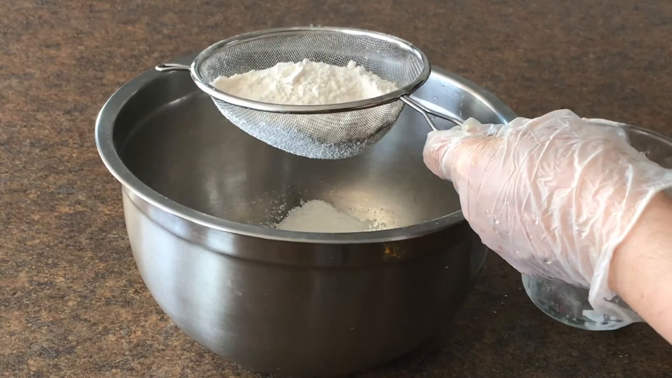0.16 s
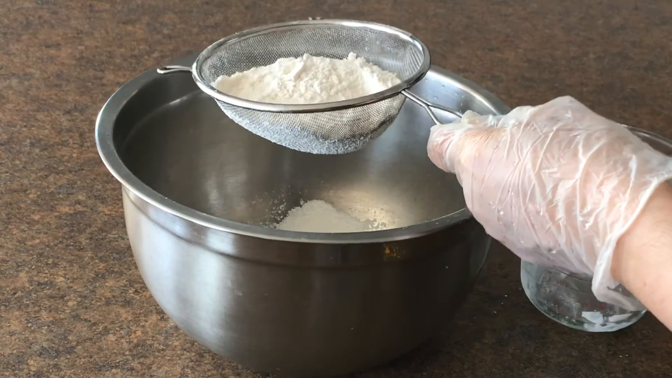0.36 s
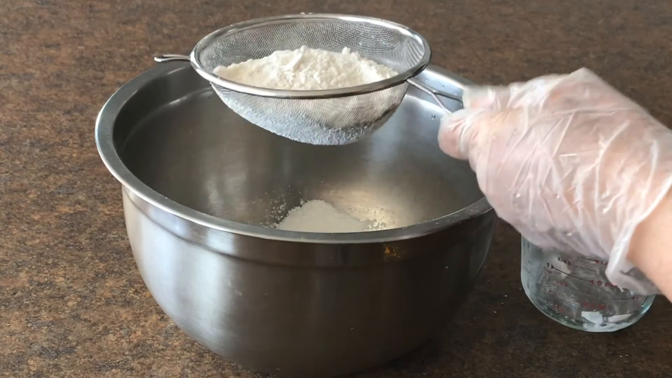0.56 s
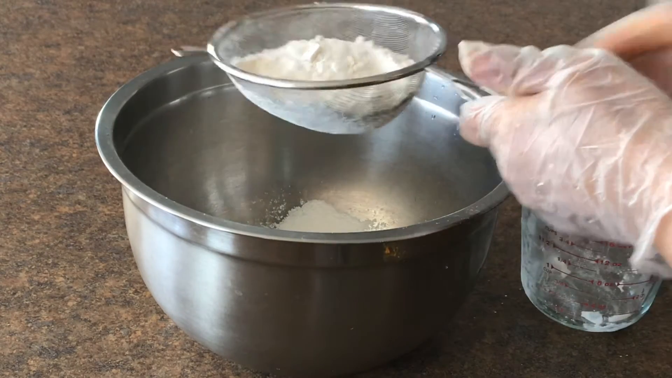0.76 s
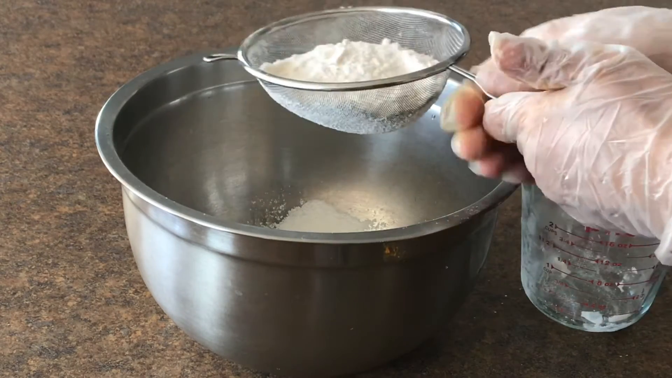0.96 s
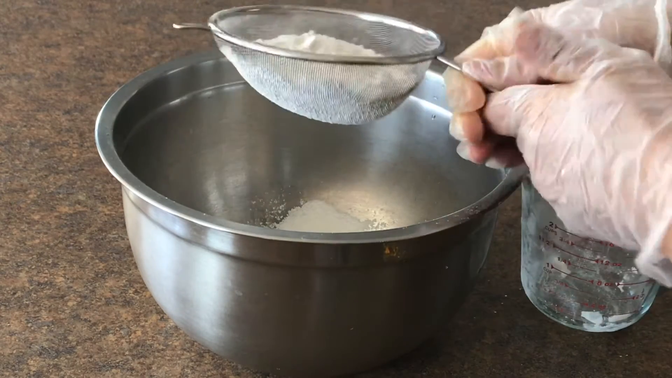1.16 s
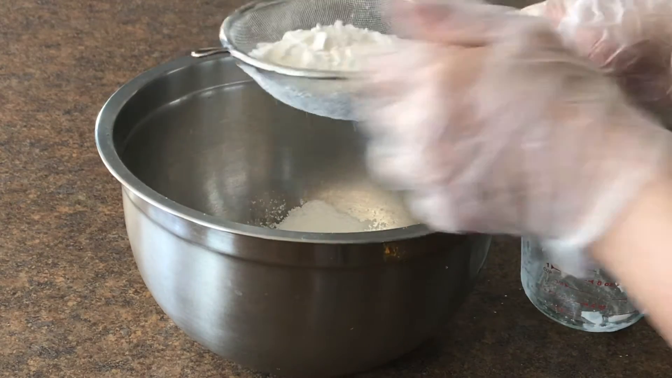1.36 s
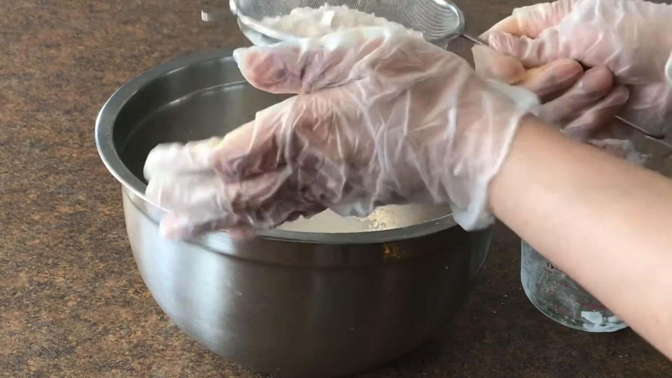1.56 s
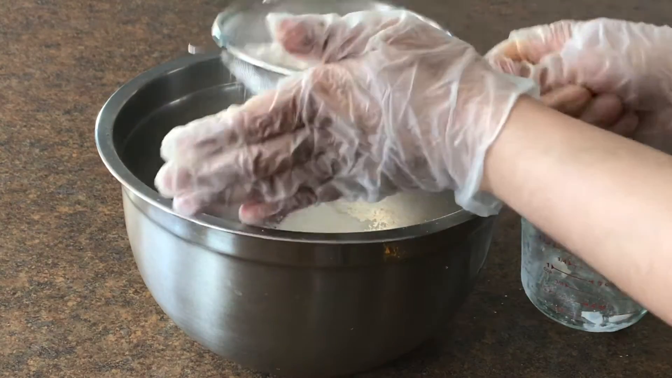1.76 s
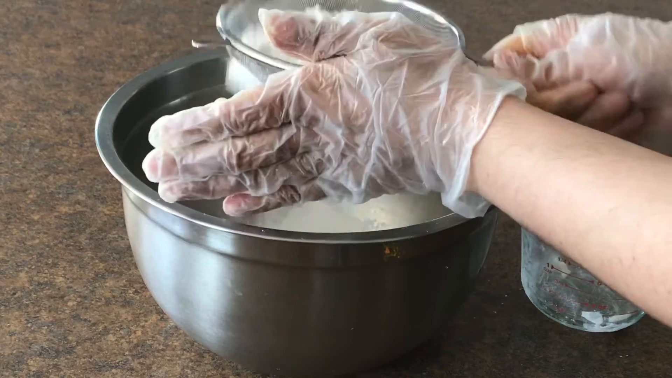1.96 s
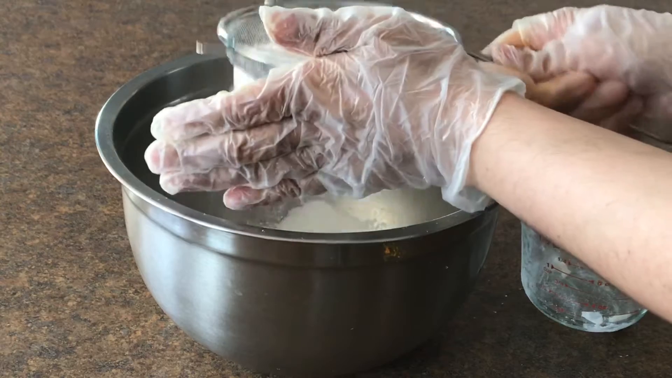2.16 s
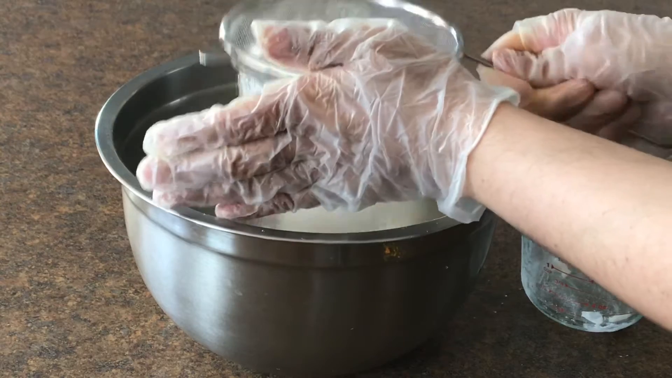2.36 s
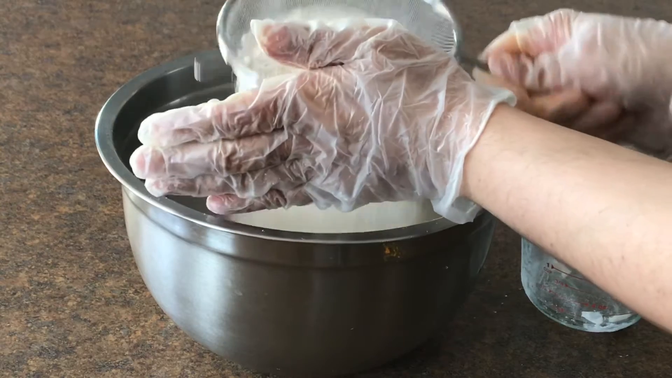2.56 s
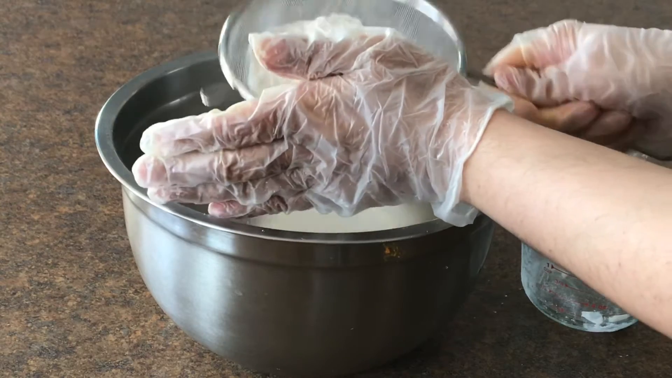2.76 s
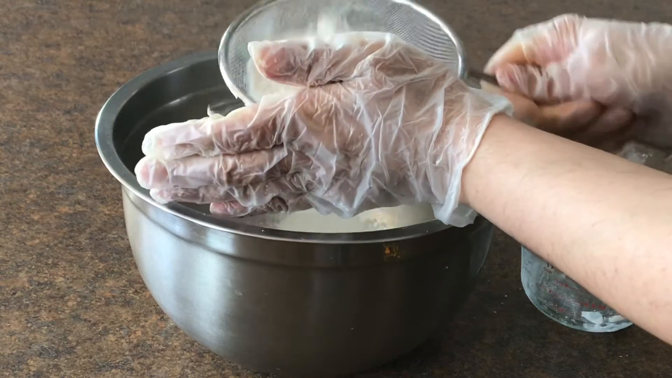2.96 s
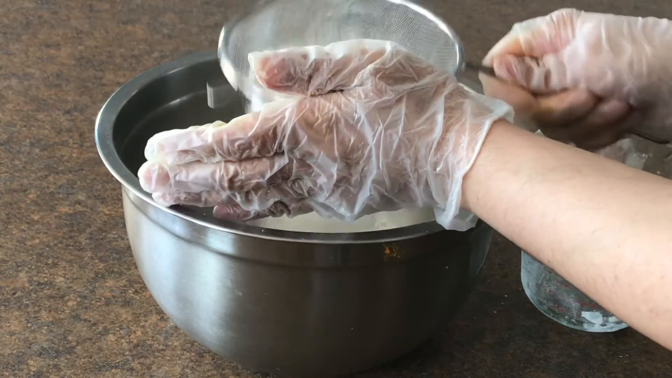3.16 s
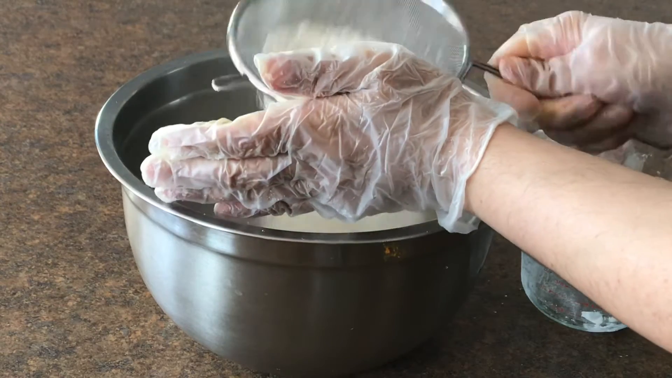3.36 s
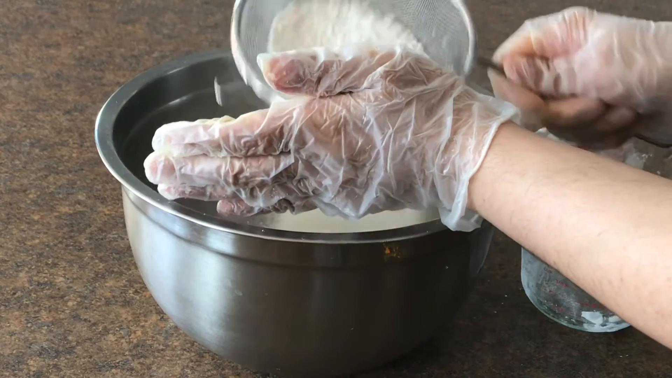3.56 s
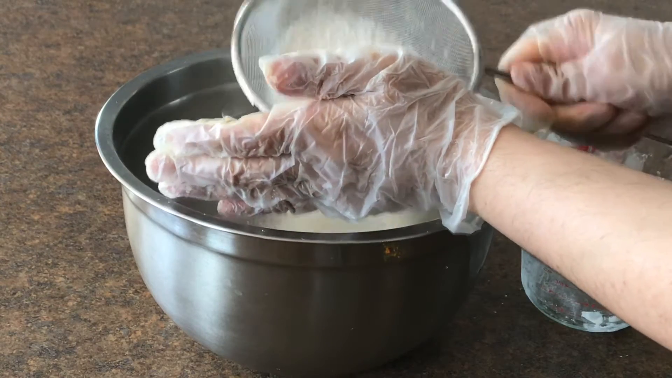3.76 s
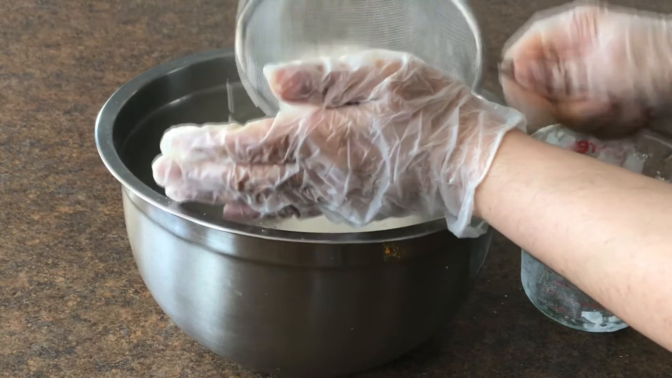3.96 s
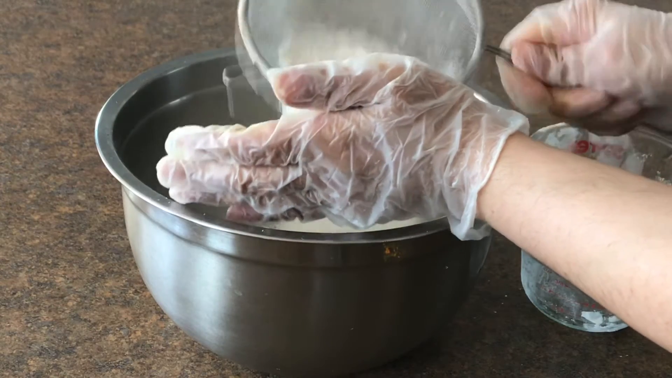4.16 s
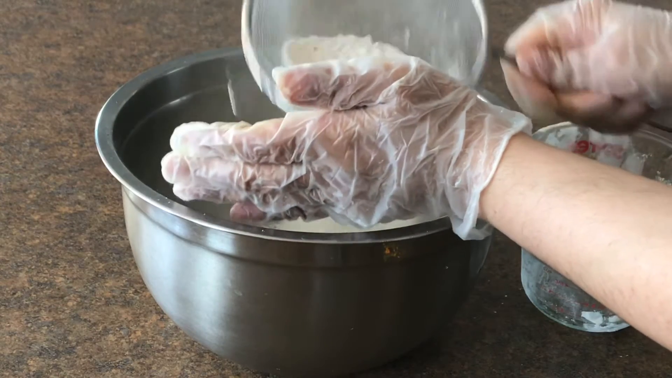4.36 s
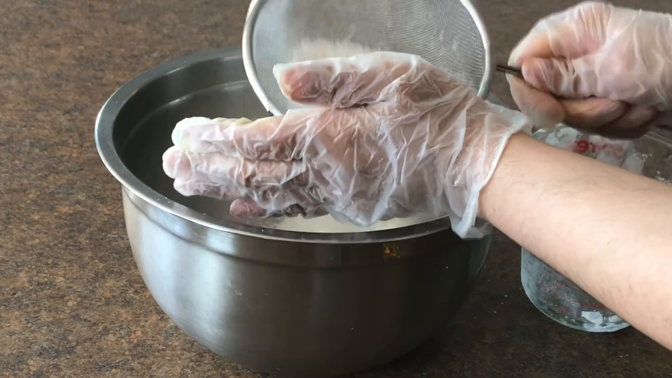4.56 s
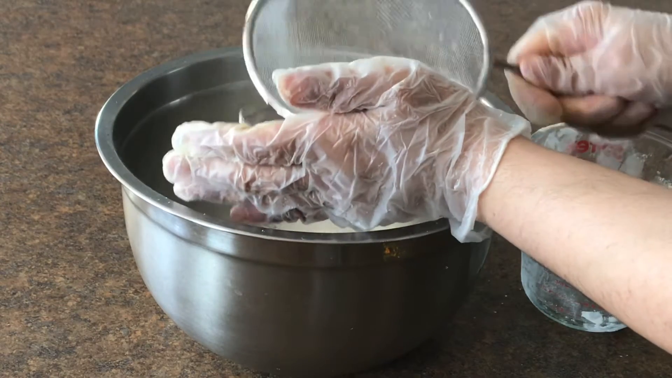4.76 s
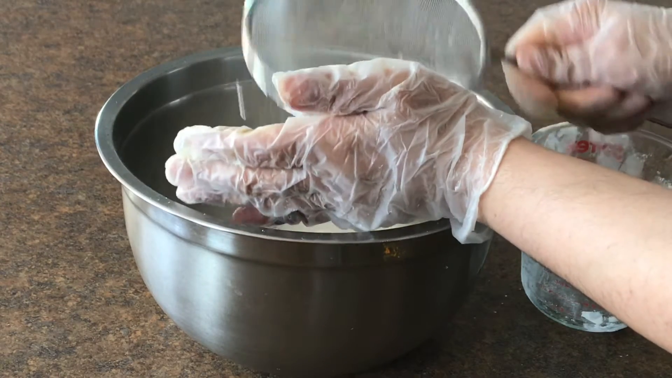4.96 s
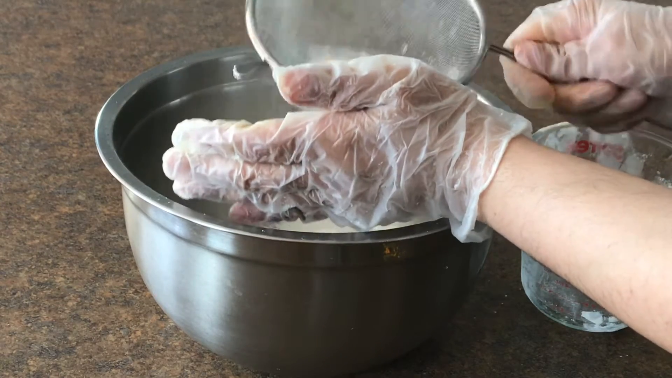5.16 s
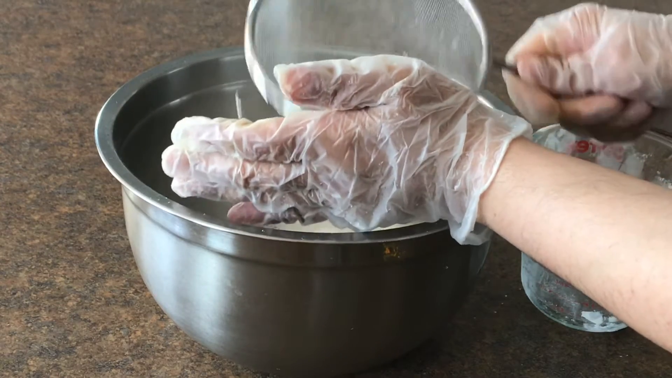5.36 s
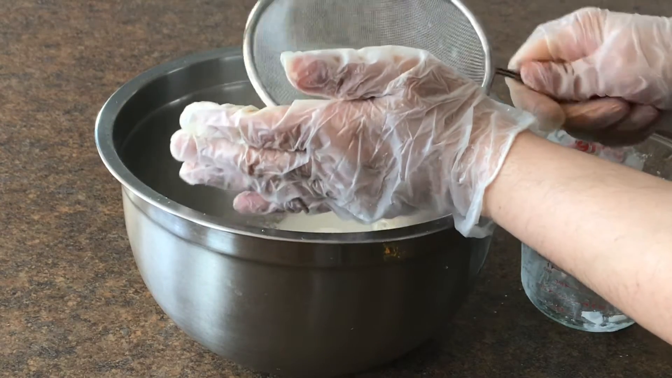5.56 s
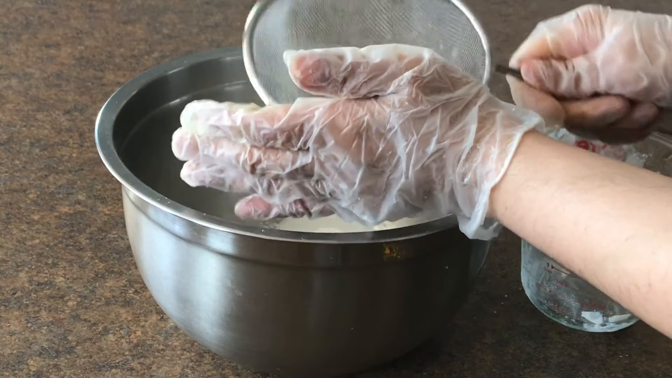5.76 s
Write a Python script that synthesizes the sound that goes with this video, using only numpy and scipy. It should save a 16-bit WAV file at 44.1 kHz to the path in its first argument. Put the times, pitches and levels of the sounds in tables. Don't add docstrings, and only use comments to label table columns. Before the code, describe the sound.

A quiet small kitchen, heard in mono from close by, with a faint low appliance hum and soft airy hiss throughout. At 0.05 s a glass jar is set down hard on a counter: by far the loudest sound, a blunt, hollow knock with a very short ring and a brief room tail. A soft dull settling follows at 0.3 s. From about 0.4 to 1.5 s thin plastic gloves rub: a soft slip near 0.5, a stronger one at 0.86, and hissy squeezes at 1.1-1.2, with tiny crease snaps. At 1.7 s sieve tapping begins, about six taps a second, slightly uneven. Each is a dry, bright click and sandy crunch with a faint palm thud, then lighter ticks as flour bounces and lands again midway between taps. Taps start weak, strengthen after 3.2 s and are loudest and crispest from 4.3 s, with a fine trickle gradually rising until the end near 5.8 s.

```python
import sys
import numpy as np
from scipy import signal
from scipy.fft import rfft, irfft, next_fast_len
from scipy.io import wavfile
from scipy.ndimage import uniform_filter1d, map_coordinates

SR = 44100
rng = np.random.default_rng(int(sys.argv[2]) if len(sys.argv) > 2 else 0)


def volts_from_db(level):
    exponent = np.asarray(level, float) / 20
    return 10 ** exponent


def to_wav(sig):
    pcm = np.clip(np.atleast_2d(sig), -1, 1) * 32767
    pcm = np.round(pcm).astype(np.int16)
    wavfile.write(sys.argv[1], SR, pcm.T)


N = 256882


def unit(x):
    return x / np.sqrt(np.mean(x ** 2) + 1e-20)


def along(points, hz):
    f, v = np.transpose(points)
    return np.interp(np.log(hz + 1), np.log(f + 1), v)


def curve(rows, before_db=None):
    s, db = np.transpose(rows)
    return np.interp(np.arange(N) / SR, s, db, before_db)


def wobble(rate):
    knots = rng.standard_normal(int(N * rate / SR) + 4)
    return map_coordinates(knots, [np.arange(N) * rate / SR])


def filtered(x, spectrum, level=np.asarray):
    m = next_fast_len(N + 8192)
    gain = level(volts_from_db(along(spectrum, np.fft.rfftfreq(m, 1 / SR))))
    return irfft(rfft(x, m) * gain, m)[..., :N]


def coloured(x, spectrum):
    return filtered(x, spectrum, unit)


def grit(rough_db, rate, patchy_db):
    z = signal.stft(rng.standard_normal(N), nperseg=128)[2]
    field = uniform_filter1d(rng.standard_normal(z.shape), size=5, axis=0)
    field = uniform_filter1d(field, size=3, axis=1)
    patchy = signal.istft(z * volts_from_db(patchy_db * unit(field)), nperseg=128)[1][:N]
    return unit(patchy * volts_from_db(rough_db * wobble(rate)))


def specks(rate, spread_db, ring_ms, bed):
    sizes = volts_from_db(spread_db * rng.exponential(size=N).clip(0, 2.2))
    strikes = (rng.random(N) < rate / SR) * sizes
    ringing = signal.lfilter([1], [1, -np.exp(-1000 / (ring_ms * SR))], strikes)
    return unit((unit(ringing) + bed) * grit(rough_db=1.0, rate=1200, patchy_db=2.5))


def bursts(seconds, level_db, rise_ms, fall_ms, square):
    power = np.zeros(N + 2 * SR)
    for s, db, rise, fall in np.broadcast(seconds, level_db, rise_ms, fall_ms):
        t = np.arange(-5 * rise, 5 * fall, 1000 / SR)
        away = np.where(t < 0, -t / rise, t / fall)
        power[round((s + t[0] / 1000) * SR):][:len(t)] += volts_from_db(db - 10 * away ** square) ** 2
    return np.sqrt(power[:N])


# frequency in Hz, t60 in seconds.
ROOM_DECAY = [(80, 0.91), (300, 0.42), (1000, 0.51), (2500, 0.43), (6000, 0.22), (12000, 0.38)]


def kitchen(x, walls):
    noise = coloured(rng.standard_normal(N), walls)[:SR]
    hz, t, z = signal.stft(noise, SR, nperseg=256)
    tail = signal.istft(z * volts_from_db(-60 * t / along(ROOM_DECAY, hz)[:, None]), SR, nperseg=256)[1]
    tail *= 1 - np.exp(-np.arange(len(tail)) / SR / 0.00034)
    delayed = np.pad(x, (90, 0))
    return signal.fftconvolve(delayed, tail / np.linalg.norm(tail))[:N]


# time in seconds, level in dB.
HUM_LEVEL = [(0.45, -66.5), (0.84, -65.5), (1.1, -67.5), (1.63, -69), (1.91, -67), (3.42, -66.5),
             (3.7, -70), (4.11, -71), (4.62, -69), (5.82, -69.5)]
# frequency in Hz, density in dB per Hz.
HUM = [(15, -32), (25, -2.5), (65, 2), (118, -3.5), (282, -1.5), (590, -12.5), (800, -28.5), (1040, -23),
       (1760, -120)]
# time in seconds, level in dB.
DRAUGHT = [(0.4, -69), (0.6, -72), (1.05, -66.5), (2.4, -67), (2.95, -68.5), (3.6, -66.5), (4.1, -72)]
# frequency in Hz, density in dB per Hz.
HISS = [(350, -17), (600, -8), (1310, -7.5), (1540, -7.5), (2130, -9), (5030, -16.5), (5610, -15),
        (7780, -20), (15600, -18.5)]


def air():
    hum = volts_from_db(curve(HUM_LEVEL) + 0.5 * wobble(5.9)) * rng.standard_normal(N)
    draught = volts_from_db(curve(DRAUGHT) - 2.5 + 0.5 * wobble(8)) * grit(rough_db=0.15, rate=54, patchy_db=2.5)
    return coloured(hum, HUM) + coloured(draught, HISS)


# start in seconds, level in dB, sharpness in dB per octave.
KNOCKS = [
    (.0514, -16.5, 0),
    (.298, -31, -22),
]
# frequency in Hz, level in dB, t60 in seconds.
COUNTER = [(148.5, -13.5, .11), (263, 2, 0.021), (417, -11.5, 0.052), (456, -15, .05), (700, -8, 0.025),
           (1020, 1.5, 0.0067), (2260, -9, 0.011), (3560, -24.5, 0.0041), (5700, -32, 0.012),
           (7900, -43.5, .003)]
# frequency in Hz, density in dB per Hz.
THUD = [(30, -34), (70, -3), (140, 2), (400, 4.5), (900, -6.5), (1500, -13), (2500, -21), (4000, -35),
        (8000, -45), (15000, -58)]


def jar():
    out, blows, t = np.zeros(N), np.zeros(N), np.arange(SR // 4) / SR
    for s, db, sharp_db in KNOCKS:
        for k, (hz, level, t60) in enumerate(COUNTER):
            late = np.maximum(t - 0.24 / hz, 0)
            size = volts_from_db(db + level + sharp_db * np.log2(hz / 150) - 60 * late / t60)
            out[round(s * SR):][:len(t)] -= (-1) ** k * size * np.sin(2 * np.pi * hz * late)
    s, db, _ = KNOCKS[0]
    blows[round(s * SR)] = volts_from_db(db + 18.0)
    return out + kitchen(blows, THUD)


# top in seconds, squeeze in dB, rise in ms, fall in ms, fine hiss above it in dB.
RUBS = [
    (0.472, -63.5, 18, 103, 3),
    (0.59, -71, 11, 43, 7.5),
    (0.804, -71, 5, 20, -12),
    (0.858, -55, 20.5, 68, -3.5),
    (1.085, -57, 55, 35, -4),
    (1.126, -54.5, 49, 11.5, 2.5),
    (1.202, -53.5, 25, 29, 6.5),
    (1.292, -80, 13, 35, -8),
]
# time in seconds, level in dB.
FIDGET = [
    (0.36, -78),
    (0.65, -81),
    (1.3, -67),
    (1.68, -79.5),
]
# frequency in Hz, density in dB per Hz.
PALM = [(410, -64), (700, -17.5), (1590, -4), (2720, -3.5), (3240, 1), (4080, -3.5), (5660, -17),
        (7000, -13), (9100, -54), (15400, -120)]
# frequency in Hz, density in dB per Hz.
FILM = [(2940, -22), (5000, -3), (5930, -1), (7180, -7), (10300, -3.5), (11300, -3), (14900, 0.5),
        (15600, -6.5)]
# start in seconds, peak in dB,
# frequency in Hz.
SNAPS = [(0.416, -53, 5900), (.705, -55, 9000), (.803, -50, 3700), (.867, -39, 3100), (.9705, -47, 12000),
         (1.177, -51, 1600), (1.4, -51, 2300), (1.5, -52, 3300), (1.288, -42.5, 1720), (1.287, -53.5, 414),
         (1.1, -55, 600), (1.3, -42, 10000), (1.51, -52, 12000), (0.37, -60, 3700), (.5, -62, 2600)]


def gloves():
    s, db, rise, fall, fine_db = np.transpose(RUBS)
    fidget = volts_from_db(curve(FIDGET, -120)) * (np.arange(N) < FIDGET[-1][0] * SR)
    squeeze = np.hypot(fidget, bursts(s, db, rise, fall, square=1.4))
    fine = np.hypot(fidget, bursts(s, db + fine_db, rise, fall, square=1.4))
    body = volts_from_db(1.1) * squeeze * specks(rate=500, spread_db=6.0, ring_ms=1.0, bed=3.5)
    film = volts_from_db(3.16) * fine * specks(rate=1500, spread_db=1.5, ring_ms=0.46, bed=3)
    out = coloured(body, PALM) + coloured(film, FILM)
    t = np.arange(SR // 50) / SR
    for s, db, hz in SNAPS:
        snap = volts_from_db(db - 60 * t * hz / 14) * np.sin(2 * np.pi * hz * t)
        out[round(s * SR):][:len(t)] += snap
    return out


USUAL_DB = -45
# first bounce in seconds, its level in dB, second level in dB.
BOUNCES = [(1.7343, -56, -66), (1.903, -49, -66), (2.241, -52, -66), (2.9131, -56, -66), (3.2308, -53, -45),
           (3.4032, -46, -44.5), (3.5604, -42.5, -41.5), (3.7276, -50, -52), (3.8917, -48, -45),
           (4.056, -48, -46), (4.1872, -38, -38), (4.3535, -38.5, -41), (4.5246, -45, -44),
           (4.6905, -40, -44), (4.847, -38.5, -42), (5.0193, -38.5, -43), (5.1862, -42, -44),
           (5.35, -38.5, -41), (5.5227, -43, -44.5), (5.694, -42, -47)]
# start in seconds, level in dB, length in ms.
RETURNS = [(1.8017, -61, 2.5), (1.9772, -51, 5.4), (2.1603, -49, 4.1), (2.3171, -55, 3.4),
           (2.499, -46.5, 2.6), (2.668, -52, 10.7), (2.8248, -43.5, 7.5), (2.9777, -41.5, 2.7),
           (3.141, -41, 2.2), (3.314, -47, 6.1), (3.4764, -45, 2.7), (3.6284, -44.5, 7.6),
           (3.8002, -39.5, 8.5), (3.963, -44.5, 6.9), (4.0964, -41.5, 4.4), (4.2588, -41, 8.8),
           (4.4276, -38, 11.3), (4.589, -40, 8.8), (4.759, -35, 8.2), (4.9242, -41, 7.9),
           (5.095, -35.5, 7.7), (5.268, -38, 8), (5.4382, -38.5, 5.2), (5.6018, -38.5, 8.1),
           (5.7752, -40.5, 4.9)]
# start in seconds, level in dB, length in ms.
LUMPS = [(1.8319, -57, 2.8), (1.8704, -39, 2.1), (2.054, -48, 4.6), (2.139, -48, 3.6), (2.34, -50.5, 2.8),
         (2.4745, -54, 4.2), (2.6446, -51.5, 3.5), (2.8029, -50, 3), (2.963, -48, 3.6), (3.0307, -41, 1.5),
         (3.128, -49, 3.7), (3.1466, -46, 8.3), (3.299, -49, 5.4), (3.46, -46.5, 3.5), (3.5153, -51, 2.5),
         (3.533, -40, 3.6), (3.664, -49, 8.9), (3.7659, -50.5, 6.6), (3.827, -46.5, 13), (3.876, -44, 2.3),
         (3.9306, -45.5, 7.6), (3.9721, -42, 2.6), (3.993, -39, 9.7), (4.044, -41, 2.7),
         (4.1284, -47.5, 5.4), (4.241, -47, 3.8), (4.5935, -41, 4.4), (4.8632, -45, 3.1),
         (4.9292, -36, 2.2), (5.8096, -47, 2.7)]


def landings():
    s, db, *_ = np.transpose(TAPS)
    first, first_db, second_db = np.transpose(BOUNCES)
    harder_db = db[np.searchsorted(s, first) - 1] - USUAL_DB
    flight = 0.02 + 0.0008 * np.maximum(harder_db, 0)
    followers = [(at + 0.007, level - 8.5, 2.1) for at, level, _ in RETURNS]
    first_bounces = np.broadcast(first, first_db, 6.5)
    second_bounces = np.broadcast(first + flight, second_db, 4.7)
    return np.transpose([*first_bounces, *second_bounces, *RETURNS, *followers, *LUMPS])


# time in seconds, level in dB.
SIFT = [(1.62, -92), (1.76, -72.5), (2.54, -72), (3.25, -71.5), (3.58, -69.5), (4.04, -67), (4.4, -66.5),
        (5.16, -65), (5.82, -64.5)]


def flour():
    s, crunch_db, *_ = np.transpose(TAPS)
    slide = bursts(s + 0.032, crunch_db - 15, 23, 38, square=3.4)
    slide = slide * specks(rate=620, spread_db=1, ring_ms=0.34, bed=1.9)
    at, db, length = landings()
    click = bursts(at - 0.0005, db + 0.5, 0.22, 0.78, square=0.47) * np.sign(rng.standard_normal(N))
    crumbs = bursts(at - 0.38 * length / 1000, db - 5.5, 0.37, 1.35 * length, square=1.62)
    ticks = click + crumbs * specks(rate=650, spread_db=6.0, ring_ms=0.47, bed=0.96)
    trickle = volts_from_db(curve(SIFT, -120) + 4.0 + 2.2 * wobble(30))
    trickle = trickle * specks(rate=150, spread_db=8.0, ring_ms=0.77, bed=1.8)
    grains = slide + ticks + trickle
    return coloured(grains, MESH) + volts_from_db(-23.5) * coloured(grains, RIM)


# click in seconds, crunch in dB, click over it in dB, rise in ms.
TAPS = [(1.712, -48, 6, 4.1), (1.8745, -49, 16.5, 9.7), (2.0576, -51.5, 18, 9.3), (2.2146, -50.5, 4, 7.7),
        (2.3867, -46, 9, 3.4), (2.55, -46.5, 6, 9.4), (2.7188, -48.5, 14.5, 10), (2.8714, -48, 13.5, 9.8),
        (3.042, -50.5, 16.5, 13), (3.1923, -44, 3, 6.4), (3.3674, -43.5, 6, 9.7), (3.5261, -43.5, 5, 3.9),
        (3.697, -44, 4, 4), (3.8625, -49, 5, 10.7), (4.0287, -50, 17, 10.9), (4.1573, -43.5, 3, 6.4),
        (4.3264, -40, 4.5, 6.3), (4.4955, -38.5, 1, 7.4), (4.6628, -38.5, 3, 8.5), (4.8211, -35, 11.5, 4.9),
        (4.9895, -36.5, 13.5, 5), (5.1593, -37.5, 9, 3.9), (5.324, -36, 8, 4.9), (5.491, -39.5, 15, 3.6),
        (5.6598, -39, 14, 4.9)]
# start in seconds, level in dB.
BRUSHES = [(1.696, -65), (2.197, -60.5), (2.372, -58.5), (2.532, -56), (2.853, -62), (3.175, -61),
           (4.643, -62), (5.148, -60), (5.311, -64), (5.645, -61)]
# frequency in Hz, density in dB per Hz.
MESH = [(1470, -38), (2500, -24), (3150, -14.5), (4870, -12), (5380, -4), (6560, -1), (8390, -2),
        (9850, -0.5), (10700, -3), (12900, -0.5), (15600, -1.5)]
# frequency in Hz, density in dB per Hz.
RIM = [(500, -39), (950, -0.5), (1200, -3.5), (1600, 1.5), (2400, -7.5), (3300, -10.5), (4500, -11),
       (7000, -38)]
# frequency in Hz, density in dB per Hz.
PUSH = [(40, -10), (90, -2.5), (350, -7), (600, -10), (1000, -36)]
# frequency in Hz, density in dB per Hz.
BRUSH = [(1000, -14), (1600, -15), (2500, -14.5), (3300, -4.5), (4000, -13), (5500, -21)]


def taps():
    s, db, click_db, rise = np.transpose(TAPS)
    harder_db = db - USUAL_DB
    fall = np.clip(11.2 - 0.58 * rise - 0.36 * harder_db, 2, None)
    click = bursts(s, db + click_db + 0.3, 0.35, 0.25, square=1.1) * np.sign(rng.standard_normal(N))
    crunch = bursts(s, db + 2.5, rise, fall, square=2.3)
    crunch = crunch * specks(rate=580, spread_db=4.5, ring_ms=0.72, bed=1.2)
    thud_db = -55 + 0.34 * harder_db - 6
    thud_db = thud_db + 6.5 * (s == s[0])
    thud = bursts(s, thud_db, 10.2, 5.5, square=1.86) * grit(rough_db=3.5, rate=600, patchy_db=-1.5)
    contact = s - 0.38 * (rise - fall) / 1000
    push = bursts(contact, -66 + 0.62 * harder_db, 15, 8.1, square=1.06) * rng.standard_normal(N)
    light = np.broadcast(contact - rise / 1000 - 0.0095, -64.5)
    touch, brush_db = np.transpose([*light, *BRUSHES])
    brush = bursts(touch, brush_db, 3, 25, square=0.88) * grit(rough_db=3.5, rate=1200, patchy_db=2.5)
    return coloured(click + crunch, MESH) + coloured(thud, RIM) + coloured(push, PUSH) + coloured(brush, BRUSH)


# frequency in Hz, level in dB.
WALLS = [(60, -4), (200, 3.5), (800, 0), (2500, -1.5), (6000, 1.5), (14000, -19.5)]


def scene():
    hands = gloves() + taps() + flour()
    return (air() + jar() + hands + volts_from_db(-13.5) * kitchen(hands, WALLS))[None]


def top_cut(x):
    return signal.sosfilt(signal.butter(12, 16810, fs=SR, output="sos"), x)


# frequency in Hz, gain in dB.
MICROPHONE = [(20, -20), (32, -6.5), (50, -0.5), (9950, -0.5), (10450, -6), (11000, -1), (15650, -5),
              (15850, -21), (17000, -54)]


def record(dry):
    return top_cut(filtered(dry, MICROPHONE))


dry = scene()
out = record(dry)
to_wav(out)
```